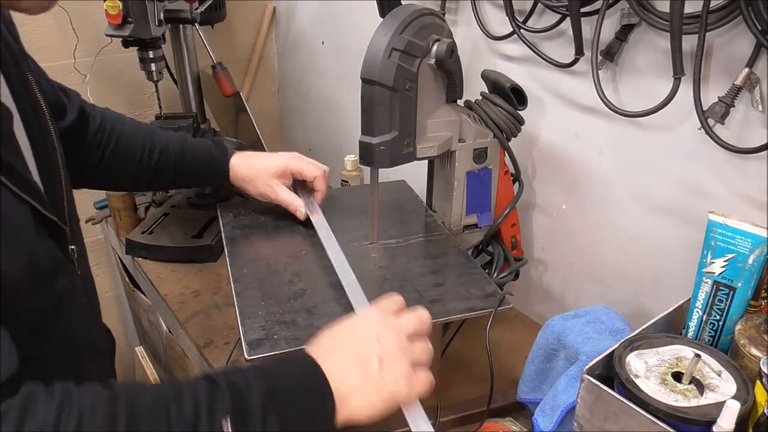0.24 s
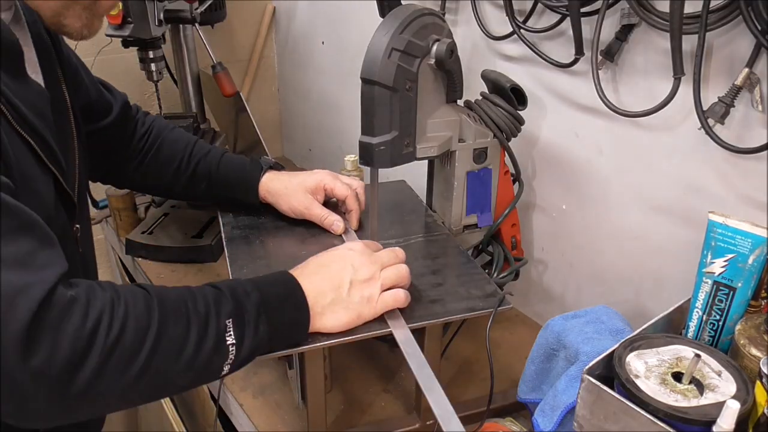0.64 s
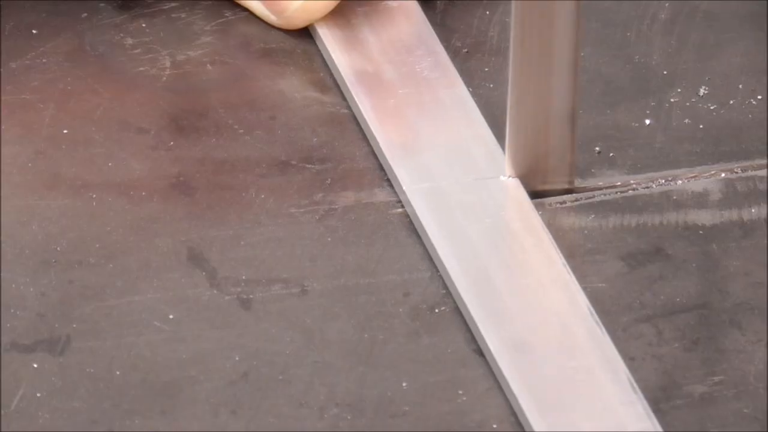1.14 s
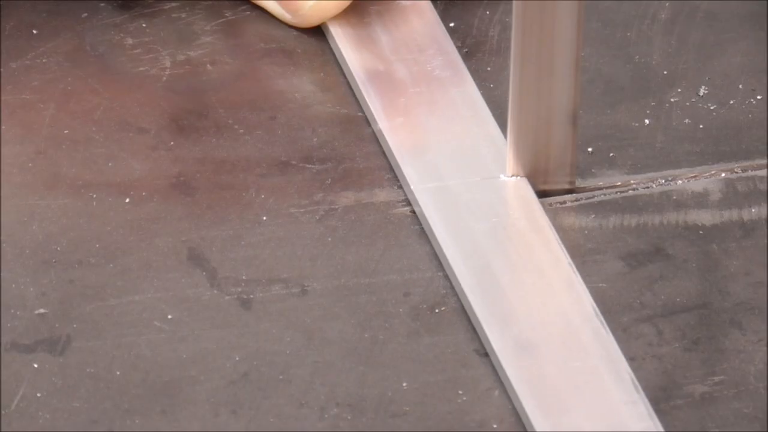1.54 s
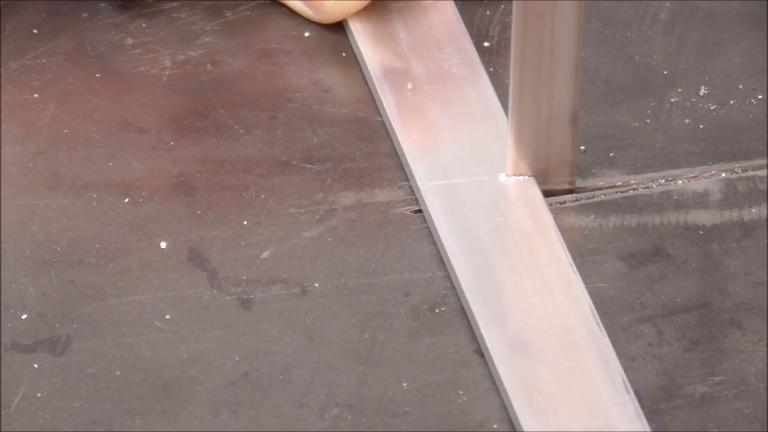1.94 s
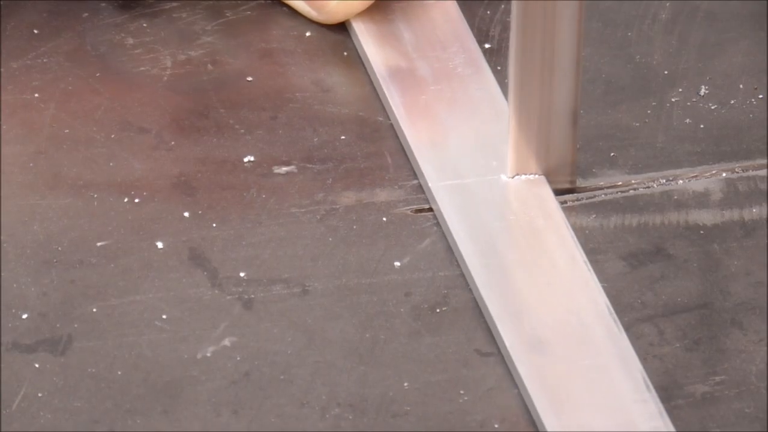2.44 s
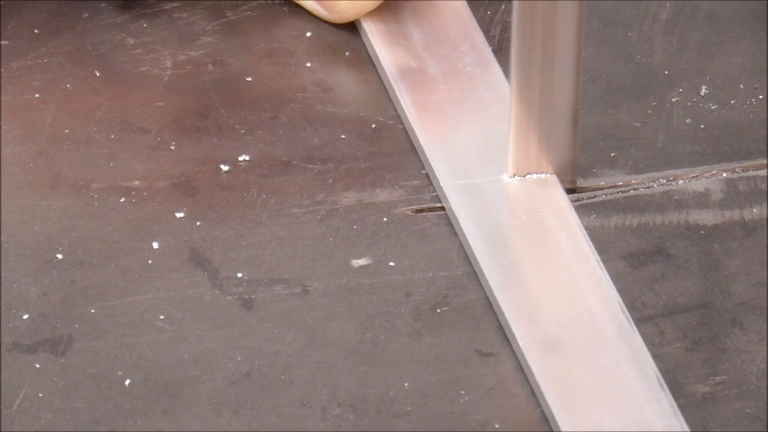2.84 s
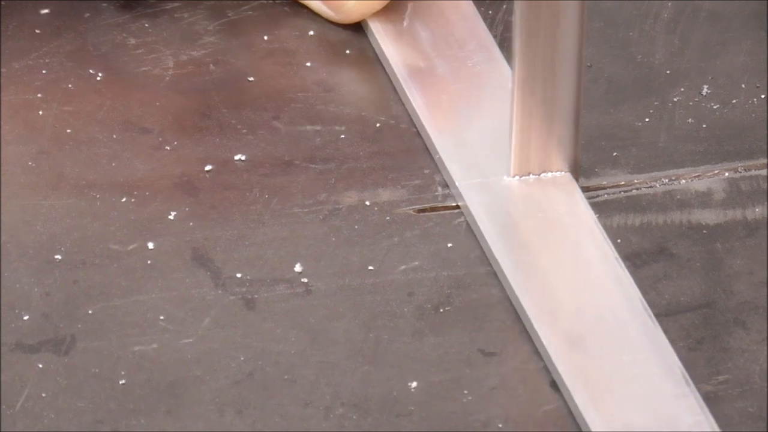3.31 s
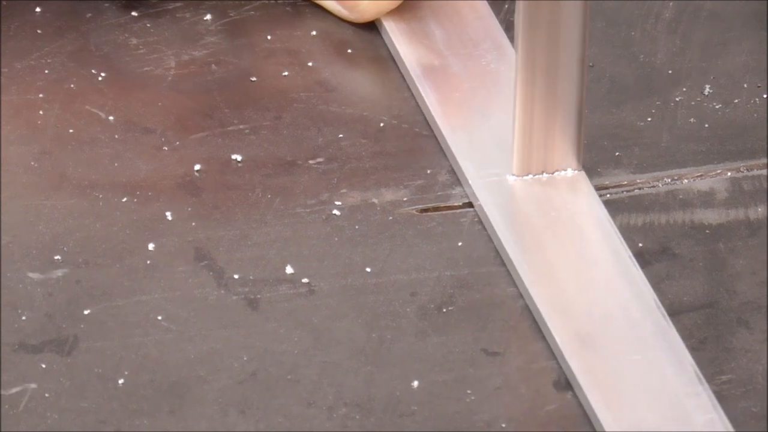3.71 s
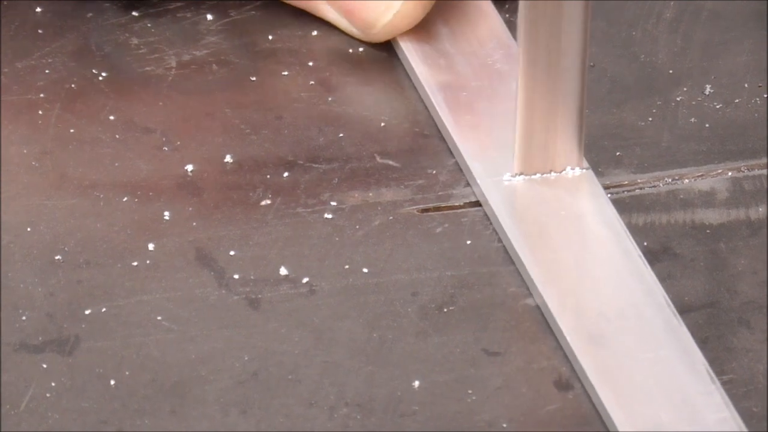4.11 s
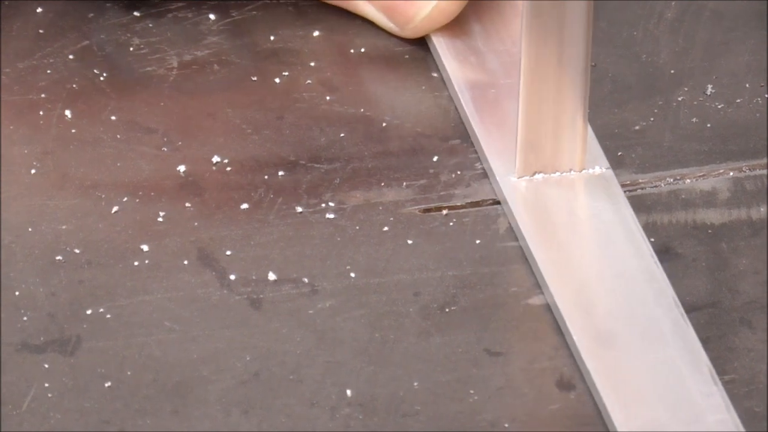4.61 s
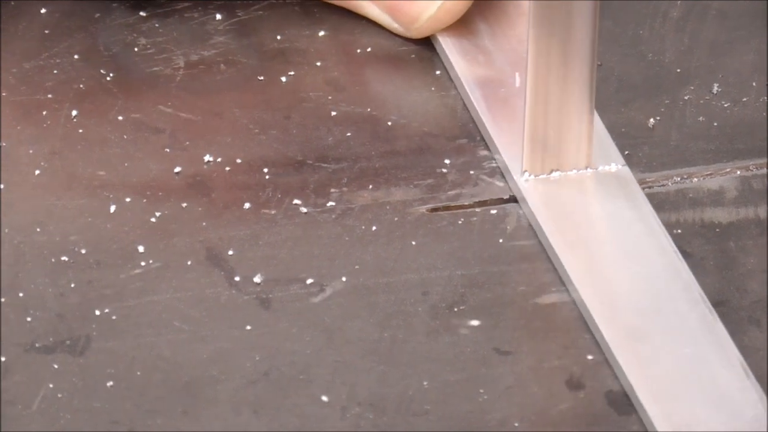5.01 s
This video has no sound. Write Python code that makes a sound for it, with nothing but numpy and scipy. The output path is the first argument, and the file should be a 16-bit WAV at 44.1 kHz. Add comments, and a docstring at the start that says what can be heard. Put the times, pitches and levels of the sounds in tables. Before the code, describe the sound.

A bandsaw runs free for a second with a whine and hiss, then saws steadily through a flat aluminum bar.

```python
"""A portable bandsaw, upright under a steel table, runs free for a second, heard wide from across the
bench: gears whine, the motor whistles, the band hisses in its guides. Then, close up and mono, it saws
a flat aluminum bar. Each tooth tears off a chip and rings bar and table. Uneven stretches of the band
come round every lap and make the table throb; now and then a chip snags or the teeth skate."""
import sys
import numpy as np
from scipy import signal
from scipy.fft import rfft, irfft, next_fast_len
from scipy.io import wavfile
from scipy.ndimage import map_coordinates

SR = 44100
rng = np.random.default_rng(int(sys.argv[2]) if len(sys.argv) > 2 else 0)


def generate_wav(signal):
    """Clip the signal to [-1, 1] and save it as 16-bit WAV at the path in sys.argv[1]."""
    frames = np.transpose(np.atleast_2d(signal))
    scaled = np.clip(frames, -1, 1) * 32767
    pcm = np.round(scaled).astype(np.int16)
    wavfile.write(sys.argv[1], SR, pcm)


N = 231726
CUT_START_S, LAP_S = 1.019, .4157

# Spectrum of tearing metal: freq_hz, gain_db
TEAR_SPECTRUM = [(40, -59), (90, -39.5), (160, -30), (300, -20.5), (450, -12.5), (1050, -15), (2300, -2),
                 (3300, -8.5), (5300, -15), (7200, -3), (9500, -2), (11000, -7), (13000, -9.5), (15700, -5)]


def sawing():
    """Teeth strike and chips shear off, driving bench, table and bar in separate frequency ranges."""
    t = clock()
    cutting = t > CUT_START_S
    feed_db, force_db, bright_db = cutting_force(t)
    impacts = dispersed(teeth(tooth_hz=2521, scatter=.42, size_db=3.5, drag=.012), spread_s=.01)
    shear = amp(-1) * rng.standard_normal(N)
    drive = cutting * (impacts + shear)
    deep, low, middle, high = (below(drive, edge_hz=hz, order=8) for hz in (370, 660, 5200, 11000))
    # as the band sinks into its slot, the table shakes more and the fizz dulls
    sunk = np.interp(t, [CUT_START_S, N / SR], [-1, 1])
    bench = deep * amp(.96 * force_db + 1.6 * sunk + 2.3 * wobble(12) - 1)
    # the table throbs with the band's sideways kicks
    kicks = drive * amp(2.55 * bite(t) + 1.6 * sunk - 3)
    kicks += cutting * below(knocks(), edge_hz=850, order=6)
    table = between(kicks, low_hz=448, high_hz=605, order=8) * amp(.18 * feed_db)
    # the bar's main ring chatters on its own
    ring = between(drive, low_hz=2140, high_hz=3000, order=20)
    bar = (middle - low - ring) * amp(.9 * force_db + .33 * wobble(60) - .25)
    bar += ring * amp(force_db + 2 * wobble(55) - 1.5)
    chips = (high - middle) * amp(force_db + bright_db + 1.5 * wobble(300) - 2.5)
    flicker_db = 1.4 * wobble(110) + 1.4 * wobble(300)
    fizz = (drive - high) * amp(force_db + bright_db - 3.2 * sunk + flicker_db - 1)
    cut = bench + table + bar + chips + fizz
    return amp(-20) * unit(coloured(cut, lambda hz: along(TEAR_SPECTRUM, hz) + resonance_db(hz)))


def teeth(tooth_hz, scatter, size_db, drag):
    """One impact per tooth, uneven in size and time (scatter, in spacings); the band drags and recovers."""
    teeth_passed = np.cumsum(tooth_hz * (1 + drag * wobble(40))) / SR
    tooth = np.arange(int(N / SR * tooth_hz))
    late, size = rng.standard_normal((len(tooth), 2)).T
    hit_samples = np.searchsorted(teeth_passed, tooth + scatter * late)
    blows = np.bincount(hit_samples, amp(size_db * size), N)[:N]
    return unit(blows - blows.mean())


# Hand pressure on the bar: time_s, feed_db
FEED_PRESSURE = [(1.02, 2.1), (1.11, -1.7), (1.4, -1.2), (1.71, -1.5), (1.88, 0.6), (2.24, -1.2),
                 (2.61, -0.3), (2.87, 0.6), (3.05, -2.0), (3.23, 1.9), (3.44, 0.1), (3.65, 2.6),
                 (3.78, -0.6), (4.05, 2.5), (4.36, 1), (4.41, 3), (4.75, -0.5), (5.25, -0.9)]
# Chips caught in the slot: time_s, half_width_s, swell_db, bright_db
CHIP_SNAGS = [(1.075, 0.014, 2.5, 0), (1.387, .005, 1.5, 2), (1.62, 0.016, 2, 1), (2.139, 0.0063, 2.5, 0.5),
              (2.606, 0.02, 0.5, 4), (2.868, 0.0053, 2.5, 2), (3.705, 0.0067, 4, -2),
              (4.634, 0.0063, 3.5, 1), (4.72, 0.0081, 6.5, 1.5), (4.867, 0.016, 3.1, 0.5),
              (5.137, 0.013, 5, 2.5)]
# Teeth skating: time_s, dip_db
TOOTH_SKATES = [(1.28, -4.5), (2.179, -5.5), (2.425, -4.5), (2.965, -3.5), (3.738, -5.5), (4.932, -4.5),
                (5.194, -2.5)]


def cutting_force(t):
    """Feed, force and brightness in dB. Force follows feed and bite; snags raise it, skates lower it."""
    feed_db = np.interp(t, *np.transpose(FEED_PRESSURE))
    skate_db = sum(db * bump(t - time_s, half_width_s=.024) for time_s, db in TOOTH_SKATES)
    snag_db = sum(db * bump(t - time_s, half_s) for time_s, half_s, db, _ in CHIP_SNAGS)
    snag_bright_db = sum(db * bump(t - time_s, half_s) for time_s, half_s, _, db in CHIP_SNAGS)
    force_db = feed_db + bite(t) + skate_db + snag_db + .62 * wobble(140) + .1 * wobble(29.92)
    bright_db = snag_bright_db - .17 * skate_db + .46 * wobble(10)
    return feed_db, force_db, bright_db


# Weld and kinks in the band: lap_offset_s, half_width_s, bite_db, knock_db
BAND_KINKS = [(.063, .006, 3.5, 39.5), (0.207, 0.0096, 1.2, 33), (.296, .012, 2, 36),
              (.377, 0.0071, 2, 36.5), (0.41, 0.0055, 1.5, 31.5)]


def bite(t):
    """Bite of the band in dB: rises through each lap, dips at dull teeth, peaks at each kink."""
    def passing(lap_offset_s, half_width_s):
        return bump((t - lap_offset_s + LAP_S / 2) % LAP_S - LAP_S / 2, half_width_s)
    rise_db = 1.7 * (t % LAP_S / LAP_S - .5)
    dull_db = -.7 * passing(lap_offset_s=.11, half_width_s=.011)
    kink_db = sum(db * passing(offset_s, half_s) for offset_s, half_s, db, _ in BAND_KINKS)
    return rise_db + dull_db + kink_db


def knocks():
    """The weld and each kink hit the guide once a lap."""
    blows = np.zeros(N)
    for lap_offset_s, _, _, knock_db in BAND_KINKS:
        times_s = np.arange(lap_offset_s, N / SR, LAP_S)
        blows[(times_s * SR).astype(int)] += amp(knock_db + 1.4 * rng.standard_normal(len(times_s)))
    return blows


def dispersed(x, spread_s):
    """Bending waves in metal: lows travel slower; the delay is spread_s at 1 kHz."""
    size = next_fast_len(N + SR // 4)
    phase = 4 * np.pi * spread_s * np.sqrt(1000 * np.fft.rfftfreq(size, 1 / SR))
    return irfft(rfft(x, size) * np.exp(-1j * phase), size)[:N]


# Resonances of table, bar and band: centre_hz, width_hz, lift_db
RESONANCES = [(121, 18, 10.9), (201, 43, 12.7), (236, 22, -7), (342, 24, 5), (407, 15, 6.6),
              (456, 64, 17.1), (512, 22, -7), (566, 57, 10.8), (633, 93, 14.6), (822, 50, 10.6),
              (946, 106, 9.7), (1224, 185, 7.2), (1310, 50, -4), (1375, 27, 9.4), (1491, 182, 8.3),
              (1675, 56, 4.1), (1787, 30, 6.3), (1931, 54, 6.4), (2389, 50, 4.5), (2529, 138, 10.2),
              (2755, 121, 5.5), (3873, 121, 6.6), (4070, 260, 6.5), (4104, 36, 8), (7509, 92, 6.7),
              (8207, 93, 2.5), (9539, 435, 3.5), (10044, 121, 3.6), (11775, 434, 4.0), (14618, 509, 4.7)]


def resonance_db(hz):
    """Summed peaks and notches of the ringing metal."""
    return sum(lift_db / (1 + ((hz - centre_hz) / (width_hz / 2)) ** 2)
               for centre_hz, width_hz, lift_db in RESONANCES)


# Spectrum of the band sliding in its guides: freq_hz, gain_db
SLIDE_SPECTRUM = [(40, -51), (90, -33), (160, -29.5), (300, -20), (450, -11.5), (1050, -5.5), (2300, -0.5),
                  (3300, -7.5), (5300, -14), (7200, -5), (9500, -1.5), (11000, -6.5), (13000, -9),
                  (15700, -5.5)]


def running_band():
    """The band rubs through its guides and rings the table lightly, barely stirring the heavy low modes."""
    def gain_db(hz):
        coupling = along([(450, .31), (650, .72), (2000, .71), (4000, .37), (9500, 1)], hz)
        return along(SLIDE_SPECTRUM, hz) + coupling * resonance_db(hz)
    rub = unit(coloured(rng.standard_normal(N), gain_db))
    return rub * amp(-26.5 + .39 * bite(clock()) + .051 * wobble(21) + .66 * wobble(200))


# Gear mesh rate: time_s, pitch_hz
GEAR_MESH = [(0, 679.5), (.6, 685), (1.7, 681), (3.4, 681.5), (4.2, 684), (4.8, 681.5), (5.25, 681.5)]
# Gear whine: harmonic, level_db
GEAR_PARTIALS = [(1, -44), (2, -51.5), (3, -42), (6, -50), (11, -52), (12, -61), (14, -57)]


def gears():
    """Meshing teeth whine, brightening early on; their speed wanders, more so under load."""
    t = clock()
    load = np.clip((t - CUT_START_S) / .02, 0, 1)
    wander = (.00123 + .00069 * load) * wobble(14) + .00267 * wobble(120)
    mesh_hz = np.interp(t, *np.transpose(GEAR_MESH)) * (1 + wander)
    phase = 2 * np.pi * np.cumsum(mesh_hz) / SR
    overtone_db = np.interp(t, [.25, .55], [-5, 0])
    return np.sqrt(2) * sum(amp(db + (k > 1) * overtone_db + 1.7 * wobble(45)) * np.sin(k * phase)
                            for k, db in GEAR_PARTIALS)


# Motor whistles: pitch_hz, level_db
MOTOR_TONES = [(2880, -49.5), (3120, -55)]


def motor():
    """Thin whistles, steady in pitch, wavering slightly in level."""
    return np.sqrt(2) * sum(amp(db + .79 * wobble(3.6)) * np.sin(2 * np.pi * hz * clock())
                            for hz, db in MOTOR_TONES)


def walls(x, t60_s):
    """Short, dense reflections of a cluttered workshop."""
    t = np.arange(SR // 5) / SR
    tail = rng.standard_normal(len(t)) * amp(-60 * t / t60_s) * (t > .002)
    return signal.fftconvolve(x, tail / np.linalg.norm(tail))[:N]


def amp(db):
    """Decibels to gain."""
    return 10 ** (np.asarray(db) / 20)


def unit(x):
    """Scale to rms 1."""
    return x / np.sqrt(np.mean(x ** 2) + 1e-20)


def clock():
    """Sample times in s."""
    return np.arange(N) / SR


def along(points, hz):
    """Interpolate (freq_hz, value) points on a log axis."""
    freqs_hz, values = np.transpose(points)
    return np.interp(np.log(hz + 1), np.log(freqs_hz + 1), values)


def bump(offset_s, half_width_s):
    """Gaussian swell of height 1 at offset 0."""
    return np.exp(-(offset_s / half_width_s) ** 2)


def wobble(rate_hz):
    """Smooth random curve, rate_hz knots a second."""
    return map_coordinates(rng.standard_normal(int(N * rate_hz / SR) + 4), [clock() * rate_hz])


def coloured(x, gain_db):
    """Minimum-phase filter with response gain_db(hz)."""
    size = 2 * next_fast_len(N // 2 + 8192)
    cepstrum = irfft(np.log(amp(gain_db(np.fft.rfftfreq(size, 1 / SR)))), size)
    cepstrum[1:size // 2] *= 2
    cepstrum[size // 2 + 1:] = 0
    return irfft(rfft(x, size) * np.exp(rfft(cepstrum)), size)[:N]


def below(x, edge_hz, order):
    """Zero-phase low-pass."""
    size = next_fast_len(N + SR // 4)
    hz = np.fft.rfftfreq(size, 1 / SR)
    return irfft(rfft(x, size) / (1 + (hz / edge_hz) ** order), size)[..., :N]


def between(x, low_hz, high_hz, order):
    """Zero-phase band-pass."""
    return below(x, high_hz, order) - below(x, low_hz, order)


# Stereo width from across the bench: freq_hz, side_gain_db
STEREO_WIDTH = [(200, -33), (380, -17), (700, -14), (1300, -11), (4400, -14), (8000, -11), (15000, -5)]


def scene():
    """The saw in the workshop: wide while it runs free, mono once it cuts."""
    saw = sawing() + running_band() + gears() + motor()
    far = np.clip((CUT_START_S - clock()) / .0084 + 1, 0, 1)
    mid = amp(.48) * (saw + amp(-12.5) * walls(saw, t60_s=.2))
    side = far * coloured(walls(saw, t60_s=.22), lambda hz: along(STEREO_WIDTH, hz))
    return np.array([mid + side, mid - side])


def record(dry):
    """Roll off the deepest bass; cut the top treble sharply."""
    high_passed = dry - below(dry, edge_hz=33, order=2)
    return below(high_passed, edge_hz=15750, order=800)


dry = scene()
out = record(dry)
generate_wav(out)
```